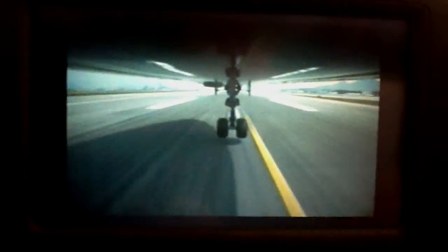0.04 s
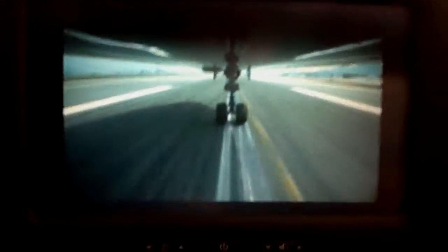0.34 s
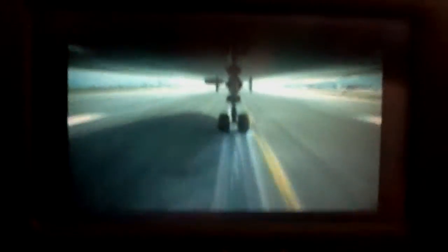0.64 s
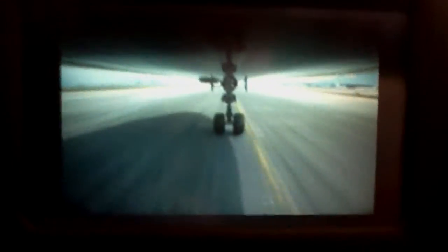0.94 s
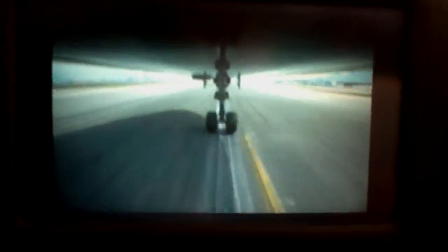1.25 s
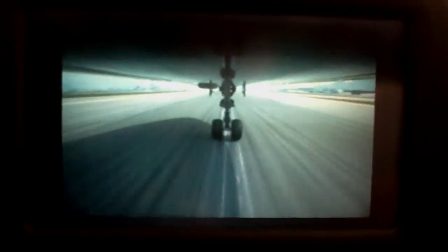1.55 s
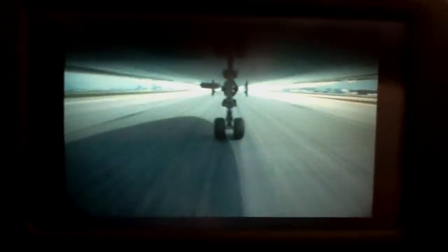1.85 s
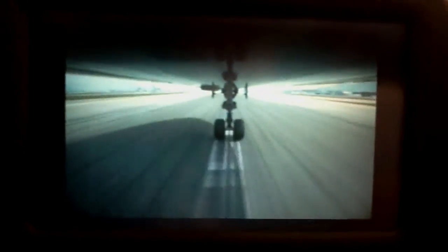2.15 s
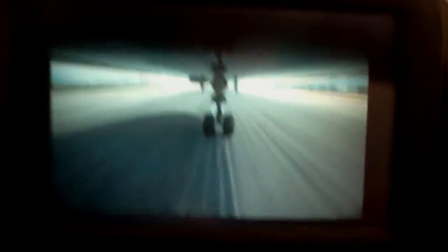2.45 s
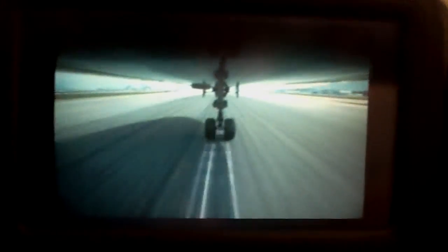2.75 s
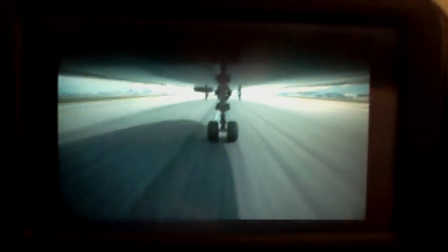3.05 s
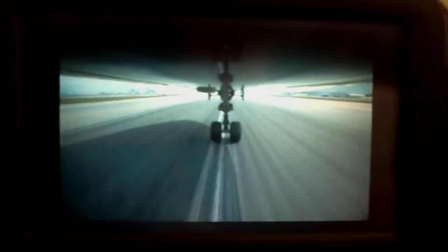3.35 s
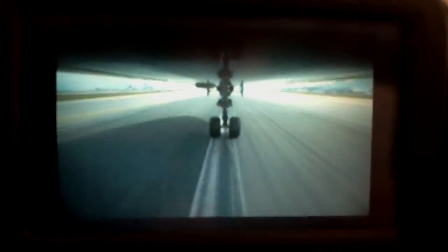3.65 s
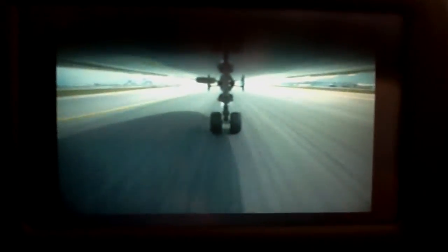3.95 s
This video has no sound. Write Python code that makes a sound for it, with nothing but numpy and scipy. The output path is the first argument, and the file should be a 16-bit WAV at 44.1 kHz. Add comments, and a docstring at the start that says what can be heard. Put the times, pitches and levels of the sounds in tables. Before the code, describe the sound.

An airliner cabin rumbles along the runway as rushing air fades and the wheels thump.

```python
"""Airliner cabin, rolling out after landing

The wheels shake the cabin with a low rumble over the deep drone of the hull. Air rushes past
in hissing surges, rings faintly in the cabin, dies away and stirs again near the end.
Jolts set trim ticking, loose panels rattling and a small metal part clinking.
In the second half, joints in the runway send up a few dull thumps."""
import sys
import numpy as np
from scipy import signal
from scipy.fft import rfft, irfft
from scipy.io import wavfile
from scipy.ndimage import uniform_filter1d

SR = 44100
rng = np.random.default_rng(int(sys.argv[2]) if len(sys.argv) > 2 else 0)


def unload_audio(sound):
    """Save the sound as a 16-bit wav file, at the path given as the first command line argument."""
    columns = np.transpose(np.atleast_2d(sound))
    # keep every value between -1 and 1, then stretch to whole-number steps
    steps = np.round(np.clip(columns, -1, 1) * 32767)
    wavfile.write(sys.argv[1], SR, steps.astype(np.int16))


N = 176400

# Fader rides for the wheel rumble, the rush of air and its treble hiss: t/s, level/dB
RUMBLE_FADER = [(0, -25), (.7, -27), (1.48, -27), (1.56, -29.5), (2.2, -30.5), (2.36, -35), (2.55, -37),
                (2.92, -40), (3.1, -35), (3.3, -34.5), (3.55, -32.5), (3.7, -29.5), (4, -31.5)]
RUSH_FADER = [(0, -40), (.2, -39), (.38, -39), (.45, -40.5), (.66, -37), (.74, -43), (.84, -38.5),
              (.95, -40), (1.19, -36.5), (1.39, -41), (1.47, -39), (1.55, -47.5), (1.79, -41),
              (1.92, -48.5), (2.15, -50), (2.24, -58.5), (2.42, -56.5), (2.58, -61.5), (2.95, -60),
              (3.1, -54.5), (3.31, -59.5), (3.36, -48.5), (3.54, -55.5), (3.63, -41.5), (3.7, -48),
              (3.8, -50), (3.91, -50), (4, -41.5)]
HISS_FADER = [(0, -61.5), (.12, -48), (.21, -47.5), (.27, -51.5), (.34, -45.5), (.45, -57.5), (.55, -45.5),
              (.68, -45.5), (.74, -53.5), (.84, -44), (.95, -53), (1.18, -45), (1.39, -63), (1.44, -46),
              (1.54, -73), (1.8, -68), (2.2, -101), (3.3, -86), (3.63, -72), (3.8, -79), (4, -67)]

# Tone curves, one for each layer: f/Hz, relative level/dB
RUMBLE_TONE = [(20, -41), (40, -48.5), (62, -17), (90, -12), (125, -2), (170, -0.5), (240, -1), (320, -9.5),
               (450, -18), (700, -32), (1500, -68.5), (6000, -94)]
DRONE_TONE = [(20, -26.5), (40, -16.5), (65, 0), (110, 0), (200, -12), (500, -40), (5000, -91)]
RUSH_TONE = [(150, -10.5), (350, 6.5), (550, 0.5), (800, 0.5), (1200, -4.5), (1900, -10.5), (2800, -18),
             (4500, -27.5), (8000, -38), (15000, -74)]
HISS_TONE = [(700, -23), (1800, 8), (3000, 3), (5000, -3.5), (7000, -11.5), (10000, -17.5), (15000, -39)]
TICK_TONE = [(1000, -6), (2500, 8), (5000, 4), (8000, -6.5), (11000, -7), (15000, -25)]
RATTLE_TONE = [(300, -14), (900, 0.5), (1700, 2), (2300, -4), (2900, -9.5), (4000, -12), (6000, -24.5),
               (9000, -35), (15000, -44)]
THUMP_TONE = [(20, -71.5), (60, -44.5), (110, -5.5), (190, 3.5), (260, -1), (350, -10.5), (560, -26),
              (800, -45), (1500, -67.5), (5000, -105)]
SNAP_TONE = [(250, -16), (600, 15.5), (1300, -4), (1900, -37), (5000, -43.5)]
FLOOR_TONE = [(100, 0.23), (3000, 0.17), (8000, -0.9), (15000, -.8)]

# Resonances of the cabin, the loose panels and the metal part: f/Hz, width/Hz, gain/dB
CABIN_MODES = [(502.7, 5.3, 8.5), (591, 12, -0.5), (789, 10.6, 1.5), (1160, 12, 0), (1814, 12, 6.5)]
PANEL_MODES = [(1300, 77, -5), (1580, 34, -0.5), (1867, 61, 2), (2255, 56, 1.5), (3450, 120, -2.5)]
METAL_MODES = [(3882, 41, 8.5), (4030, 79, -16), (5550, 160, -12), (7920, 77, -15)]

# Trim ticks: t/s, level/dB
TICK_CUES = [(.1, -43.5), (.2, -46), (.222, -45), (0.317, -38.5), (.405, -42.5), (1.255, -45),
             (1.283, -46.5), (2.806, -64), (3.871, -60)]
# Panel rattles: t/s, level/dB, attack/s, decay/s
RATTLE_CUES = [(0.757, -26.5, .001, 0.014), (.815, -28.5, .005, 0.016), (1.027, -27, .001, 0.0066),
               (1.122, -34, .001, .006), (1.165, -25.5, 0.0098, 0.016), (1.245, -28, .008, 0.01),
               (1.326, -32.5, .001, 0.0059), (1.339, -28.5, .008, 0.012), (1.419, -39.5, .006, 0.039),
               (1.637, -40.5, .006, 0.01), (1.735, -40, .006, 0.014), (1.784, -29.5, .002, 0.0043),
               (1.867, -45, .001, 0.0088), (2.125, -47, .02, .02), (2.402, -46.5, .01, 0.0091),
               (2.805, -49, .002, 0.0053), (3.048, -30.5, .02, 0.0095), (3.106, -51.5, .004, 0.013),
               (3.336, -52.5, .001, .005), (3.869, -45.5, .002, 0.0069)]
# Metal clinks: t/s, level/dB
CLINK_CUES = [(.818, -36), (1.25, -40.5), (1.785, -52)]
# Wheels striking runway joints: t/s, peak level/dB, pitch ratio, snap level/dB
THUMP_CUES = [(2.2335, -6, 0.96, -28.5), (2.2662, -9, 1.09, -41), (2.4617, -6, 1.07, -52),
              (2.4738, -18, 0.82, -68.5), (2.61, -14.5, 0.98, -53), (2.9973, -7.5, 0.98, -63),
              (3.0414, -11, 1.1, -35)]

CLICK_ATTACK_S = .0005


def undb(db):
    """Decibels to gain."""
    return 10 ** (np.asarray(db) / 20)


def unit(x):
    """Scale to rms 1."""
    return x / np.std(x)


def fader(rows):
    """Gain over time from points of t/s, level/dB."""
    return undb(np.interp(np.arange(N) / SR, *np.array(rows).T))


def response(tone):
    """Minimum-phase impulse response of a tone curve."""
    hz, db = np.array(tone).T
    bin_hz = np.maximum(np.arange(N // 2 + 1) * SR / N, 1)
    gain = undb(np.interp(np.log(bin_hz), np.log(hz), db))
    cepstrum = irfft(np.log(gain), N)
    cepstrum[1:N // 2] *= 2
    cepstrum[N // 2 + 1:] = 0
    return irfft(np.exp(rfft(cepstrum)), N)


def equalise(x, tone):
    """Shape a signal with a tone curve; rms 1."""
    return unit(irfft(rfft(x) * rfft(response(tone)), N))


def noise(tone):
    """Coloured noise, rms 1."""
    return equalise(rng.standard_normal(N), tone)


def flutter(spread_db, rate_hz):
    """A gain that wavers smoothly and randomly around 0 dB."""
    hold = int(SR / rate_hz)
    steps = np.repeat(rng.standard_normal(N // hold + 1), hold)
    drift = uniform_filter1d(uniform_filter1d(steps, hold), hold)
    return undb(spread_db * unit(drift[:N]))


def burst(start, attack_s, decay_s):
    """Envelope with a quick attack and an exponential tail."""
    age = np.maximum(np.arange(N) / SR - start, 0)
    return (1 - np.exp(-age / attack_s)) * np.exp(-age / decay_s)


def ring(x, modes):
    """Sum of the resonances driven by x."""
    return sum(undb(db) * signal.lfilter(*signal.iirpeak(hz, hz / width, fs=SR), x)
               for hz, width, db in modes)


def contacts(per_second=6600):
    """Dense tiny impacts at random moments, of uneven strength."""
    strength = rng.standard_normal(N)
    return (rng.random(N) < per_second / SR) * strength


def wheel_rumble():
    """The runway shakes the cabin through the wheels: a low rumble with a slight flutter."""
    shake = noise(RUMBLE_TONE)
    shake /= np.sqrt(uniform_filter1d(shake ** 2, size=4000))  # iron out the noise's own swells
    return shake * fader(RUMBLE_FADER) * flutter(spread_db=.97, rate_hz=20)


def hull_drone(level_db=-49):
    """The hull hums with a deep, steady bed of noise."""
    return undb(level_db) * noise(DRONE_TONE)


def rushing_air():
    """Air surges over the hull, slightly grainy; it sings faintly in the cabin and hisses when strong."""
    rush = noise(RUSH_TONE) * fader(RUSH_FADER) * flutter(spread_db=1.02, rate_hz=40.55)
    hiss = noise(HISS_TONE) * fader(HISS_FADER) * flutter(spread_db=3.1, rate_hz=60.5)
    grain = flutter(spread_db=.94, rate_hz=350)
    return (rush + hiss) * grain + ring(rush, CABIN_MODES)


def trim_ticks():
    """Jolted trim gives light, bright ticks, each a short spray of tiny contacts."""
    envelope = sum(undb(db) * burst(t, CLICK_ATTACK_S, decay_s=.0064) for t, db in TICK_CUES)
    return equalise(contacts(), TICK_TONE) * envelope


def panel_rattles():
    """Jolts set loose panels chattering, and the chatter rings their resonances."""
    envelope = sum(undb(db) * burst(t, attack, decay) for t, db, attack, decay in RATTLE_CUES)
    chatter = equalise(contacts(), RATTLE_TONE) * envelope
    return chatter + ring(chatter, PANEL_MODES)


def metal_clinks():
    """Tiny impacts ring a small metal part in short, high clinks."""
    envelope = sum(undb(db) * burst(t, CLICK_ATTACK_S, decay_s=.013) for t, db in CLINK_CUES)
    return unit(ring(contacts(), METAL_MODES)) * envelope


def joint_thumps():
    """A joint gives one push: a brief snap, then a few low, heavily damped swings of gear and hull."""
    knock = response(THUMP_TONE)[:SR // 10]
    knock /= np.abs(knock).max()
    snap = noise(SNAP_TONE)
    out = np.zeros(N)
    for t, peak_db, pitch, snap_db in THUMP_CUES:
        playhead = (np.arange(N) - t * SR) * pitch  # varispeed: higher is also shorter
        out += undb(peak_db) * np.interp(playhead, np.arange(len(knock)), knock, left=0, right=0)
        out += undb(snap_db) * snap * burst(t, CLICK_ATTACK_S, decay_s=.0026)
    return out


def scene():
    """The mono mix, as heard from the seat."""
    bed = wheel_rumble() + hull_drone() + rushing_air()
    fittings = trim_ticks() + panel_rattles() + metal_clinks()
    return (bed + fittings + joint_thumps())[None]


def record(dry):
    """Lay a faint, steady hiss under the mix and cut the extreme top steeply."""
    floor_db, top_hz = -66.5, 15250
    noise_floor = undb(floor_db) * noise(FLOOR_TONE)
    high_cut = signal.ellip(12, .2, 80, top_hz, fs=SR, output="sos")
    return signal.sosfilt(high_cut, dry + noise_floor)


dry = scene()
out = record(dry)
unload_audio(out)
```